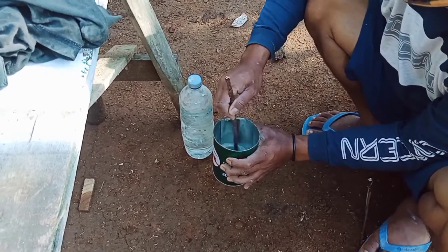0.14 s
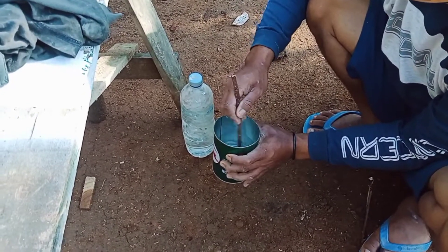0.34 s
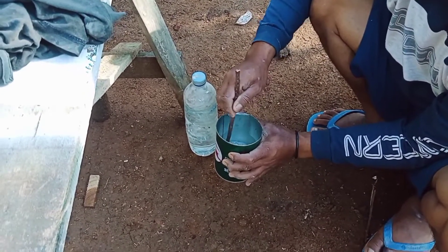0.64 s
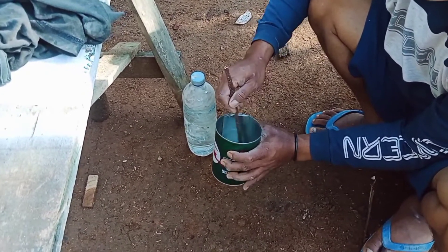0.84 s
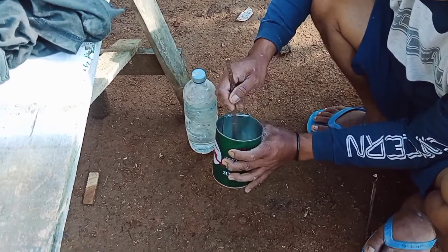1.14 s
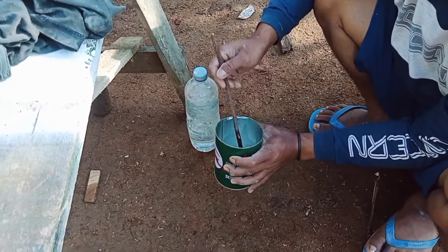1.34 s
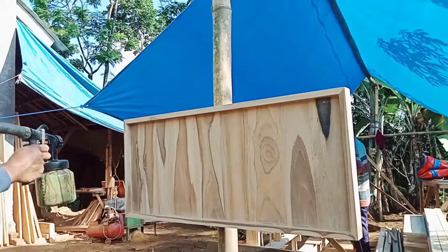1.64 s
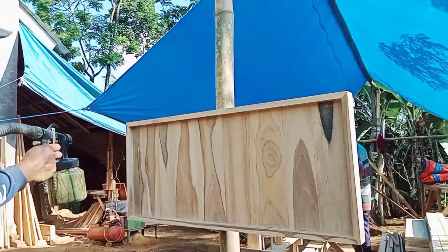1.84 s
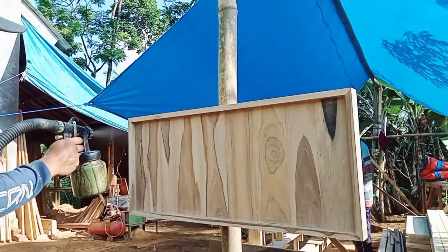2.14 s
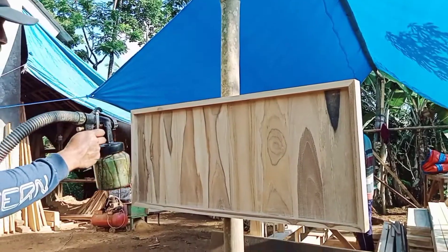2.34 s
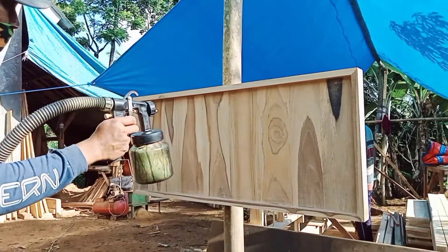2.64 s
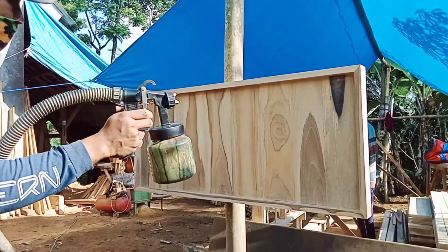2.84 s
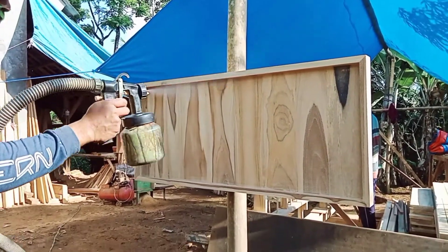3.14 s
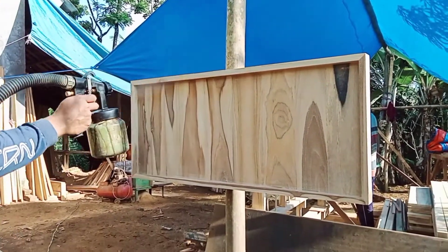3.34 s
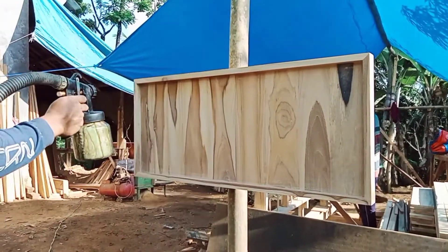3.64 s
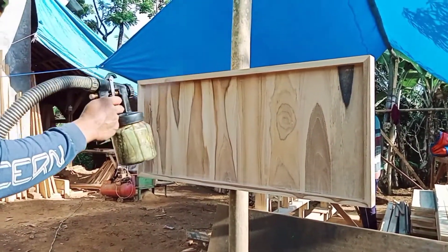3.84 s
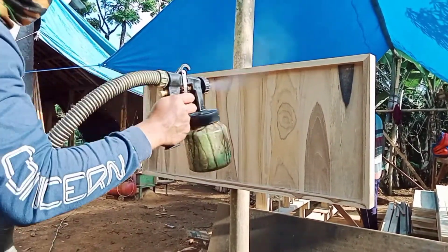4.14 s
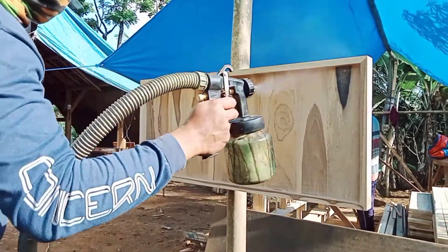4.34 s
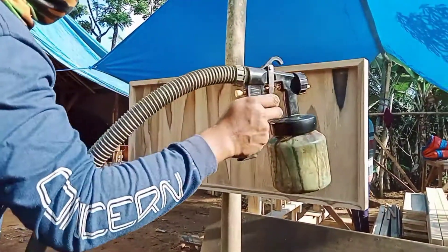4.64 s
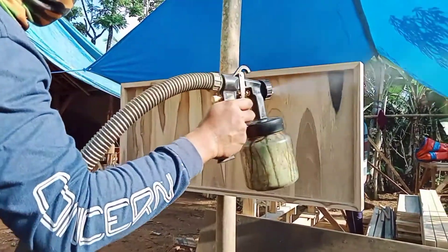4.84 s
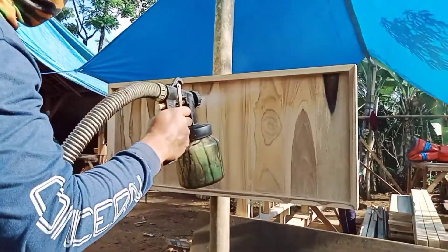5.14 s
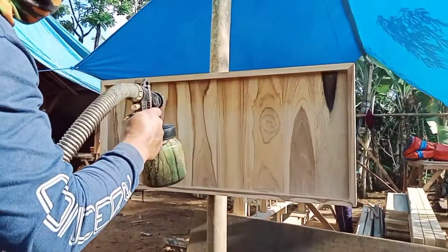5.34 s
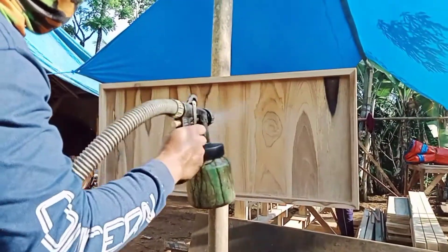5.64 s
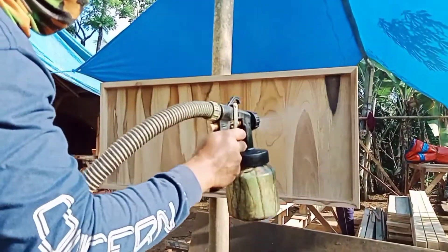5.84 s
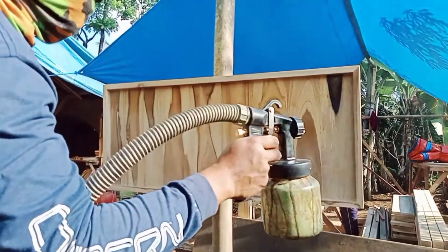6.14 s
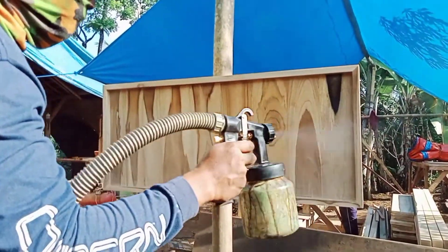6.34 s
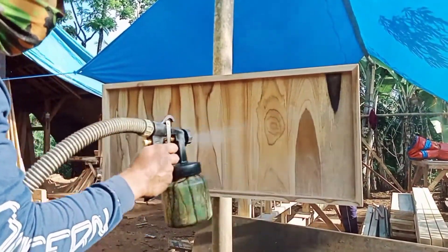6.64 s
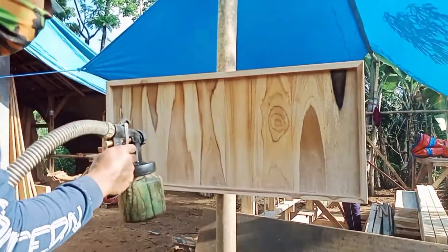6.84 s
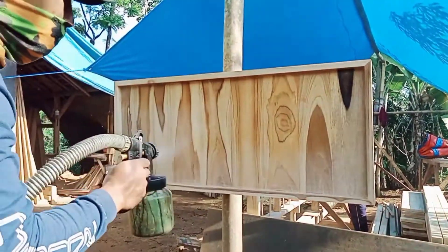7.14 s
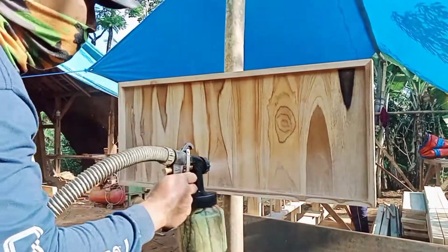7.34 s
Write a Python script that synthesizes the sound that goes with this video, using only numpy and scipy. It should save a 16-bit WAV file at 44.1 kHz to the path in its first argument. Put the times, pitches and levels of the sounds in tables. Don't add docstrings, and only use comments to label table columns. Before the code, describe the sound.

In a quiet open yard, a wooden stick stirs a hand-held paint tin, with quick damped knocks, gritty scrapes and small pings, while a bird gives a few short falling chirps. After about one and a half seconds the scene fades quickly to a turbine paint sprayer winding up to a steady mid-pitched hum, with rushing hose air and bright nozzle hiss that shifts as the gun moves. Mono phone microphone, fairly close and dry.

```python
import sys
import numpy as np
from scipy import signal
from scipy.io import wavfile
from scipy.ndimage import uniform_filter1d

SR = 44100
rng = np.random.default_rng(int(sys.argv[2]) if len(sys.argv) > 2 else 0)


def nominal_scale(level):
    x = np.asarray(level, float) / 20
    return 10 ** x


def persist_wave(psi):
    counts = np.round(np.clip(psi, -1, 1) * 32767).astype(np.int16)
    wavfile.write(sys.argv[1], SR, np.atleast_2d(counts).T)


N = 329868
TIME = np.arange(N) / SR


def evened(x):
    return x / np.sqrt(np.mean(x ** 2) + 1e-20)


def wander(x, size):
    return evened(uniform_filter1d(uniform_filter1d(x, size=size), size=size))


def read(points, hz):
    f, value = np.transpose(points)
    return np.interp(np.log(hz + 1), np.log(f + 1), value)


def shape(points, hz):
    power = nominal_scale(read(points, hz)) ** 2
    return power / power.sum()


def curves(rows, t):
    s, *columns = np.transpose(rows)
    return [np.interp(t, s, c) for c in columns]


def bell(x, centre, half_width):
    return np.exp(-((x - centre) / half_width) ** 2)


def bumps(rows, x):
    return sum(db * bell(x, centre, half) for centre, half, db in rows)


def add(mix, s, sound):
    part = mix[round(s * SR):][:len(sound)]
    part += sound[:len(part)]


def ring(x, hz, width):
    return signal.lfilter(*signal.iirpeak(hz, hz / width, SR), x)


def glide(x, hz, width):
    turn = np.exp(2j * np.pi * np.cumsum(hz) / SR)
    r = np.exp(-np.pi * width / SR)
    smooth = signal.lfilter([(1 - r) ** 2], [1, -2 * r, r ** 2], x / turn + 1e-18)
    return 2 * (turn * smooth).real


def noise(layers, patchy_db, streak_db, flicker_db):
    frames, hz = N // 256 + 5, np.fft.rfftfreq(1024, 1 / SR)[:, None]
    a, b, patches, streaks = rng.standard_normal((frames, 513, 4)).T
    patches = evened(uniform_filter1d(uniform_filter1d(patches, size=8, axis=0), size=24, axis=1))
    streaks = evened(uniform_filter1d(uniform_filter1d(streaks, size=2, axis=0), size=90, axis=1))
    gusts = evened(uniform_filter1d(rng.standard_normal(frames), size=4))
    chance_db = patchy_db * patches + streak_db * streaks / (1 + (hz / 3500) ** 2) + flicker_db * gusts
    z = (a + 1j * b) * np.sqrt(layers(np.arange(frames) * 256 / SR, hz)) * nominal_scale(chance_db)
    return signal.istft(z, nperseg=1024, noverlap=768)[1][:N] * np.sqrt(3 / 2)


# time in seconds, offset in Hz.
DRIFT_HZ = [(3.3, 0), (3.9, .9), (4.9, -.6), (5.3, -.2), (6, -1), (7.48, -1.3)]
FULL_HZ, LACK_HZ, SPIN_UP_S = 529.6, 130, 0.31


def shaft_hz(t):
    lack = LACK_HZ * np.exp(-(np.maximum(t, 1.4) - 1.6) / SPIN_UP_S)
    return FULL_HZ - lack + curves(DRIFT_HZ, t)[0]


FADE_IN_S, FADE_LENGTH_S, FADE_POWER = 1.506, 0.22, 2.73
HUM_LAW, ROAR_LAW, HISS_LAW, FIZZ_LAW = 4.2, 0.41, 0.2, 2.3
HISS_LEAD_S, HUM_LAG_S = 0.025, 0.053


def spin(t, law):
    fade = np.clip((t - FADE_IN_S) / FADE_LENGTH_S, 0, 1) ** FADE_POWER
    return fade * (shaft_hz(t) / FULL_HZ) ** law


# time in seconds, nearness in dB,
# ground-bounce notch in Hz, hose resonance in Hz, gun lowered from 0 to 1.
PAINTER = [(1.6, -3, 1620, 2105, 0), (2.35, -0.2, 1460, 2020, 0.3), (3, -2.5, 1500, 2016, 0.36),
           (3.35, -1.9, 1470, 1920, 0.4), (3.75, -1.3, 1340, 1995, 0), (4.15, 0.9, 1240, 2004, 0.1),
           (4.6, -0.5, 1190, 2055, 0.4), (5.3, -0.5, 1210, 1980, 0.76), (5.8, -0.5, 1234, 2116, 0.7),
           (6.3, -0.3, 1150, 2050, 0.6), (6.6, -1.1, 1240, 1952, 1), (7.48, -0.5, 1130, 1906, 0.96)]
# frequency in Hz, density in dB per Hz.
ROAR_SPECTRUM = [(190, -34), (255, -6.5), (450, -7.5), (680, -4), (900, -8.5), (1060, -5.5), (1700, -2),
                 (2000, -1.5), (2400, -4), (3100, -6), (4000, -13), (5000, -23.5), (6200, -30), (7600, -45)]
# time in seconds, half width in seconds, gain in dB, pitch in Hz.
CAP_RINGS = [(2.32, .1, 5, 2800), (2.85, 0.13, 4, 3000), (4.1, 0.36, 3.5, 3000), (4.6, 0.11, 1, 2200),
             (4.9, 0.17, 5.5, 3180), (5.75, 0.21, 9, 2860), (6.36, 0.11, 12, 2720), (7.3, .2, 7.5, 2660),
             (7.1, 0.25, 8, 3560), (4.5, 0.18, 5, 960), (7.36, 0.066, 8.5, 1120), (6.6, 0.2, 4.5, 1500),
             (2.76, .25, -9, 1640), (3.7, .2, -5, 1450), (4.1, 0.23, 11, 4300)]
# time in seconds, half width in seconds, gain in dB.
SURGES = [
    (2.75, 0.45, 3.5),
    (3.45, 0.12, -1.5),
    (4.75, 0.46, 2),
    (5.2, 0.12, -0.5),
    (6.3, 1, 2),
]
# frequency in Hz, half width in Hz, gain in dB.
HOSE_OVERTONES = [(839, 23, 13.5), (1370, 44, 3)]
# time in seconds, half width in seconds, gain in dB.
TURNS = [
    (2.72, 0.3, 5.5),
    (3.16, 0.026, 3),
    (4.5, 0.12, 5.5),
    (5.2, 0.23, 2),
    (6.12, 0.096, 4),
    (6.9, 0.15, 3.5),
]
ROAR_DB, TURN_ROAR = -33.5, 0.022
CAP_WIDTH_HZ = 110
OVERTONES_GONE_S, OVERTONES_FADING_S = 3.53, 0.21


def hose_power(t, hz):
    near_db, notch_hz, pipe_hz, _ = curves(PAINTER, t)
    level = nominal_scale(ROAR_DB + 0.77 * near_db + TURN_ROAR * bumps(TURNS, t)) * spin(t, ROAR_LAW)
    colour_db = 5.4 * bell(hz, pipe_hz, 55) - 7.9 * bell(hz, notch_hz, 90)
    for s, half, db, cap_hz in CAP_RINGS:
        colour_db += db * bell(t, s, half) * bell(hz, cap_hz, CAP_WIDTH_HZ)
    colour_db += bumps(SURGES, t) * np.clip(hz / 2500, 0, 1.5)
    colour_db += bumps(HOSE_OVERTONES, hz) * np.clip((OVERTONES_GONE_S - t) / OVERTONES_FADING_S, 0, 1)
    return level ** 2 * shape(ROAR_SPECTRUM, hz) * nominal_scale(colour_db) ** 2


# frequency in Hz, density in dB per Hz.
HISS_SPECTRUM = [(5500, -28), (6500, -20), (7200, -7), (7700, -8), (8300, 3), (9200, -0.5), (9800, -9.5),
                 (11000, -36)]
TOP_SPECTRUM = [(9000, -35), (9900, 6), (11300, 1), (12300, -11), (13500, -26), (14500, -22)]
FIZZ_SPECTRUM = [(11200, -16.5), (12300, -24), (13100, -8.5), (14100, -11), (15380, -3.5), (15500, -15),
                 (15640, -49), (16000, -100)]
# time in seconds, half width in seconds, gain in dB.
FANS = [
    (2.0, 0.3, 2.5),
    (2.65, 0.32, 7),
    (4.15, 0.22, 5),
    (4.5, 0.13, 7),
    (4.85, 0.077, 3),
    (6.15, 0.22, 10),
    (6.75, 0.25, -8),
]
# time in seconds, echo delay in ms.
GAP_MS = [(1.8, .832), (2.05, .724), (2.34, .726), (2.53, .815), (2.8, 1.155), (2.94, 1.092), (3.13, .936),
          (3.29, .88), (3.52, .972), (3.69, .976), (3.9, 1.056), (4.15, 1.11), (4.29, 1.196), (5.45, 1.196),
          (5.63, 1.276), (6.05, 1.665), (6.66, 1.17), (7.05, 1.08), (7.48, 1.24)]
HISS_DB, TOP_DB, FIZZ_DB = -38, -50, -47.5
LOWERED_HISS_DB, LOWERED_TOP_DB, LOWERED_FIZZ_DB = -2, -2.5, 6
WHISTLE_HZ, WHISTLE_DB, WHISTLE_GONE_S = 8200, 13, 0.14
FAN_EDGE_HZ, FAN_EDGE, FAN_FIZZ = 12100, 0.45, 0.1
SHOULDER_HZ, SHOULDER_DB = 13500, -9
ECHO_SHARE, ECHO_LOST_PER_DB, ECHO_LOST_LOWERED = 0.39, 0.008, 0.2
ECHO_LOW_HZ, ECHO_TOP_HZ = 6800, 12200


def jet_power(t, hz):
    lowered = curves(PAINTER, t)[3]
    turn_db, fan_db = bumps(TURNS, t), bumps(FANS, t)
    hiss = nominal_scale(HISS_DB + turn_db + LOWERED_HISS_DB * lowered) * spin(t + HISS_LEAD_S, HISS_LAW)
    top = nominal_scale(TOP_DB + fan_db + LOWERED_TOP_DB * lowered) * spin(t, FIZZ_LAW)
    fizz = nominal_scale(FIZZ_DB + FAN_FIZZ * fan_db + LOWERED_FIZZ_DB * lowered) * spin(t, FIZZ_LAW)

    starting = np.exp(-np.maximum(t - FADE_IN_S, 0) / WHISTLE_GONE_S)
    hiss = hiss * nominal_scale(starting * (WHISTLE_DB * bell(hz, WHISTLE_HZ, 250) - 8.3))
    top = top * nominal_scale(FAN_EDGE * fan_db * bell(hz, FAN_EDGE_HZ, 600))
    narrowing = 1.5 - 1.5 * lowered - 0.082 * fan_db
    fizz = fizz * nominal_scale(SHOULDER_DB * narrowing * bell(hz, SHOULDER_HZ, 700))

    share = np.clip(ECHO_SHARE - ECHO_LOST_PER_DB * turn_db - ECHO_LOST_LOWERED * lowered, 0, 1)
    band = 1 / (1 + (hz / ECHO_TOP_HZ) ** 6) / (1 + (ECHO_LOW_HZ / (hz + 1)) ** 8)
    echo = share * band * np.cos(2 * np.pi * hz * curves(GAP_MS, t)[0] / 1000)
    jet = hiss ** 2 * shape(HISS_SPECTRUM, hz) + top ** 2 * shape(TOP_SPECTRUM, hz)
    jet = jet + fizz ** 2 * shape(FIZZ_SPECTRUM, hz)
    return jet * nominal_scale(11 * echo) ** 2


# frequency in Hz, density in dB per Hz.
RUMBLE_SPECTRUM = [(20, -26), (40, -33), (65, -20), (110, 7), (150, 4), (190, 2.5), (215, -24),
                   (280, -19.5)]
# time in seconds, half width in seconds, gain in dB.
RUMBLE_SWELLS = [
    (1.85, 0.53, 6),
    (5, .4, 0),
    (6.25, 0.5, 5.5),
]
BLOWER_DB = -56.5


def air():
    def layers(t, hz):
        rumble = nominal_scale(BLOWER_DB + bumps(RUMBLE_SWELLS, t)) * spin(t, 0)
        return rumble ** 2 * shape(RUMBLE_SPECTRUM, hz) + hose_power(t, hz) + jet_power(t, hz)
    return noise(layers, patchy_db=1.64, streak_db=1.87, flicker_db=0.61)


# shaft order, level in dB under the hum.
OVERTONES = [(2, -25.5), (3, -27.5)]
# time in seconds, half width in seconds, gain in dB.
GLIMPSES = [(1.77, .16, 15), (2.17, .1, 14), (2.5, .12, 12), (2.78, .14, 13), (3.3, .26, 13.5),
            (3.85, .17, 8), (4.25, .22, 13), (4.75, .3, 13.5), (5.12, .1, 7), (6.45, .1, 7), (6.9, .12, 6),
            (7.38, .2, 7)]
HUM_DB, WHINE_DB, OVERTONE_WOBBLE_RAD = -27, -56.5, 0.9


def turbine():
    turn = 2 * np.pi * np.cumsum(shaft_hz(TIME)) / SR
    waver = [wander(w, 900) for w in rng.standard_normal((2, N))]
    hum = np.sin(turn)
    for k, db in OVERTONES:
        hum += nominal_scale(db - 0.5 + 5.2 * waver[1]) * np.sin(k * turn + k + OVERTONE_WOBBLE_RAD * waver[0])
    hum *= nominal_scale(HUM_DB + curves(PAINTER, TIME)[0] + 0.12 * waver[0]) * spin(TIME - HUM_LAG_S, HUM_LAW)
    whine = np.sin(7 * turn + 0.25 * waver[0])
    whine *= nominal_scale(WHINE_DB + bumps(GLIMPSES, TIME) + 2.7 * waver[1]) * spin(TIME + HISS_LEAD_S, 0)
    return np.sqrt(2) * (hum + whine)


PIPE_DB, PIPE_WIDTH_HZ, PIPE_LOWERED_DB = -50, 24, 3


def whistle():
    near_db, _, pipe_hz, lowered = curves(PAINTER, TIME)
    tone = evened(glide(rng.standard_normal(N), pipe_hz, PIPE_WIDTH_HZ))
    return nominal_scale(PIPE_DB + near_db + PIPE_LOWERED_DB * lowered) * spin(TIME - HUM_LAG_S, ROAR_LAW) * tone


def body(x, modes):
    out = 0
    for k, (hz, width, db) in enumerate(modes):
        out = out + (-1) ** k * nominal_scale(db) * ring(ring(x, hz, 2 * width), hz, width)
    return out


# frequency in Hz, width in Hz, level in dB.
TIN_MID = [(1070, 92, -5), (1360, 64, -11), (1500, 46, -3), (1800, 100, 0), (2020, 430, -5.5)]
TIN_TOP = [(2350, 84, -10), (2716, 89, -4.5), (3110, 360, -6.5), (3400, 52, -7), (3640, 300, -9)]
# time in seconds,
# peak in dB, wall pitch in Hz, clang in dB, mode under the blow in Hz.
SIDE_KNOCKS = [(0.123, -30.5, 585, -5.5, 1920), (0.174, -30.5, 595, -13, 1460), (0.228, -57, 667, 14, 1360),
               (0.307, -29, 582, -4, 1350), (0.393, -35, 670, -7, 1800), (0.426, -31, 608, -7, 2050),
               (0.493, -49, 615, 6, 1310), (0.51, -29, 626, -1.5, 1850), (0.543, -25.5, 597, -13, 2220),
               (0.553, -22.5, 552, -22, 1230), (0.589, -36.5, 664, 3.5, 1430),
               (0.649, -28.5, 598, -7, 1800), (0.658, -35, 627, 2.5, 1070), (1.104, -62, 650, 12, 1570),
               (1.131, -49, 540, 5, 2080)]
TIP_KNOCKS = [(0.042, -31.5, 574, -15, 1510), (0.054, -32.5, 610, -1.5, 1990), (0.101, -41, 605, -16, 1740),
              (0.289, -25.5, 620, -3.5, 1630), (0.608, -28.5, 593, -10, 1390), (0.718, -35, 570, -22, 1520),
              (0.73, -31.5, 604, -22, 1460), (0.778, -38, 610, -22, 1060), (0.842, -54, 620, 16, 2080),
              (0.86, -30, 588, 0, 1970), (0.883, -41, 587, -1, 1800), (0.892, -56, 603, 8, 2100),
              (0.924, -61, 522, 24.5, 2050), (1.012, -39.5, 660, -7, 2040), (1.027, -37, 588, -24, 2030),
              (1.146, -41.5, 540, -8, 1250), (1.252, -33, 640, 6, 1630), (1.282, -42, 517, -8, 1440),
              (1.297, -39, 635, -2.5, 1950), (1.312, -46, 610, -10, 2350)]
SIDE_TOP_DB, TIP_TOP_DB = -23, -0.5


def knocks():
    out, t = np.zeros(N), TIME[:4000]
    contact = (t / 0.0045 * np.exp(1 - t / 0.0058)) ** 2
    clang = (1 - np.exp(-t / 0.0014)) ** 2 * np.exp(-t / 0.007)
    blows = [(*row, SIDE_TOP_DB) for row in SIDE_KNOCKS] + [(*row, TIP_TOP_DB) for row in TIP_KNOCKS]
    rattles = rng.standard_normal((len(blows), 4000))
    for (s, db, hz, mid_db, spot_hz, top_db), rattle in zip(blows, rattles):
        wall = contact * np.sin(2 * np.pi * hz * t) + 7.3 * ring(rattle * contact, hz * 1.03, 60)
        spot = 2.5 * ring(ring(rattle * clang, spot_hz, 160), spot_hz, 90)
        middle = spot + body(rattle * clang, TIN_MID)
        upper = body(rattle * clang ** 2, TIN_TOP)
        parts = [(0, wall), (mid_db, middle), (mid_db + top_db, upper)]
        add(out, s - 0.003, sum(nominal_scale(db + level_db) * p / abs(p).max() for level_db, p in parts))
    return signal.sosfilt(signal.butter(2, 5500, fs=SR, output="sos"), out)


# start in seconds, length in seconds, pressure in dB,
# pressure change in dB, brightness in dB.
STROKES = [(0, 0.033, -50, -6, 1), (.125, 0.018, -50, -2, -6), (.165, 0.043, -44.5, 1, -18),
           (0.239, 0.09, -41.5, 4, -17.5), (0.413, 0.02, -42.5, -6, -6), (0.503, 0.063, -45, -2, -11),
           (.59, 0.026, -44.5, 0, -21), (0.645, 0.055, -46, -2, -9), (0.731, 0.022, -53.5, 0, -7),
           (0.786, 0.037, -59, -13, -1), (0.854, 0.23, -64.5, -4.5, 6), (1.122, 0.058, -54.5, 3, -4.5),
           (1.237, 0.077, -65.5, 7.5, 6), (1.333, 0.11, -71, -1, 4)]
STROKE_RISE_DB_S, STROKE_FALL_DB_S = 505, 547


def strokes(brightness):
    out = np.zeros(N)
    for s, length, db, change_db, bright_db in STROKES:
        edge_db = STROKE_RISE_DB_S * np.maximum(s - TIME, 0)
        edge_db += STROKE_FALL_DB_S * np.maximum(TIME - s - length, 0)
        held_db = db + brightness * bright_db + change_db * np.clip((TIME - s) / length, 0, 1)
        out += nominal_scale(held_db - np.minimum(edge_db, 200))
    return out


# time in seconds, low mode in Hz.
STICK_HZ = [(0, 1510), (.11, 1500), (.17, 1300), (.44, 1530), (.48, 1320), (.69, 1510), (.8, 1610),
            (1.35, 1580)]
STICK_HIGH_HZ, STICK_WANDER = 2864, 0.053
GRIT_DB, GRIT_HZ = -11.5, 8700


def scrape():
    lumps = [nominal_scale(3.3 * evened(uniform_filter1d(w, size=400))) for w in rng.standard_normal((3, N))]
    slips = (rng.random(N) < 5500 / SR) * nominal_scale(1.9 * rng.exponential(1, N))
    slips = slips * rng.choice([-1, 1], N)
    low_hz = curves(STICK_HZ, TIME)[0]
    high_hz = STICK_HIGH_HZ * (1 + STICK_WANDER * wander(rng.standard_normal(N), 2000))
    low = evened(glide(slips, low_hz, 230)) + 0.44 * evened(body(slips, TIN_MID))
    low += 0.65 * evened(ring(slips, 920, 220))
    low += 0.48 * evened(ring(ring(slips, 560, 160), 640, 80))
    high = 0.66 * evened(glide(slips, high_hz, 160)) + evened(body(slips, TIN_TOP))
    low, high = signal.sosfilt(signal.butter(2, 5000, fs=SR, output="sos"), [low, high])
    grit = slips + 3.5 * rng.standard_normal(N)
    for width_hz in (2100, 3200, 4020):
        grit = ring(grit, GRIT_HZ, width_hz)
    gains = strokes(0), strokes(0.56), nominal_scale(GRIT_DB) * strokes(0.83)
    return sum(gain * evened(x * lump) for gain, x, lump in zip(gains, (low, high, grit), lumps))


# time in seconds, peak in dB, pitch in Hz.
TICKS = [(0.0574, -44, 5330), (0.1276, -45, 8400), (0.2944, -59, 8100), (0.402, -52, 9050),
         (0.4294, -49, 8790), (0.4813, -50, 8250), (0.5237, -62.5, 8470), (0.599, -47, 8450),
         (0.6659, -46, 8700), (0.7487, -54, 8900), (0.8096, -65, 8260), (0.8594, -47, 8440),
         (0.8819, -48, 8140), (0.8939, -47, 6000), (0.9294, -43, 8000), (1.0144, -43, 8370),
         (1.1336, -46, 8460), (1.1777, -38.5, 8200), (1.254, -46, 8200), (1.286, -51, 8400),
         (1.3124, -60, 6210), (1.3239, -62, 8960)]
SNAPS = [
    (0.394, -34, 1840),
    (0.883, -37, 3140),
    (0.895, -36, 2130),
    (1.1055, -42, 1600),
    (1.2835, -50, 1600),
    (1.3112, -34, 2680),
]
# time in seconds, peak in dB.
CLICKS = [(0.0535, -37), (0.1705, -54), (0.251, -56), (0.2895, -47), (0.3945, -46), (0.5107, -48),
          (0.599, -54), (0.647, -48), (0.8046, -58), (0.8585, -46), (0.8815, -50), (0.895, -46),
          (0.921, -50), (0.929, -46), (1.011, -52), (1.2535, -37), (1.2605, -50), (1.3119, -43)]
TICK_S, SNAP_S, CLICK_S, CLICK_TOP_HZ = 0.002, 0.00106, 0.0005, 4500


def ticks():
    out, t = np.zeros(N), TIME[:900]
    rows = [(*row, TICK_S) for row in TICKS] + [(*row, SNAP_S) for row in SNAPS]
    for (s, db, hz, decay_s), snap in zip(rows, rng.standard_normal((len(rows), 900))):
        tick = snap * t * np.exp(-t / decay_s)
        for width in (0.1, 0.2, 0.25, 0.3):
            tick = ring(tick, hz, width * hz)
        add(out, s - decay_s, nominal_scale(db) * tick / abs(tick).max())
    colour = signal.butter(2, [900, CLICK_TOP_HZ], "band", fs=SR)
    for (s, db), snap in zip(CLICKS, rng.standard_normal((len(CLICKS), 900))):
        click = signal.lfilter(*colour, snap * np.exp(-t / CLICK_S))
        add(out, s, nominal_scale(db) * click / abs(click).max())
    return out


# time in seconds, peak in dB, length in seconds.
PUFFS = [(0.053, -61, .004), (0.068, -56, .007), (0.124, -59, .010), (0.1705, -62, .003),
         (0.216, -69, .004), (0.251, -66, .006), (0.33, -61, .009), (0.4015, -61, .007),
         (0.453, -68, .006), (0.516, -64, .007), (0.599, -63, .005), (0.657, -69, .005),
         (0.751, -64, .004), (0.8435, -67, .005), (0.859, -62, .006), (0.881, -57, .003),
         (0.929, -59, .005), (0.983, -72, .004), (1.011, -66, .007), (1.122, -66, .005),
         (1.151, -65, .008), (1.229, -71, .003), (1.26, -64, .012)]
# time in seconds, peak in dB, pitch in Hz.
PINGS = [(0.0538, -42, 3150), (0.0545, -30.5, 590), (0.135, -37, 590), (0.148, -45, 2700),
         (0.229, -34, 1360), (0.2922, -20.5, 1775), (0.3945, -32, 620), (0.404, -42, 3080),
         (0.4863, -39, 1320), (0.5102, -43, 2620), (0.5557, -36, 1230), (0.6053, -38, 3110),
         (0.6295, -42, 2650), (0.675, -40, 1060), (0.6983, -42, 2530), (0.8086, -44, 2830),
         (0.9258, -33.5, 2700), (0.9842, -53, 2600), (1.0874, -44, 2600), (1.1633, -49, 2680),
         (1.2201, -47, 2650), (1.237, -53, 2700), (1.2965, -47, 2650), (1.303, -42, 1100),
         (1.262, -35, 600), (1.2985, -44, 623), (0.719, -37, 597), (0.428, -38, 1720), (0.6, -34, 1080),
         (0.535, -42, 2250)]
PUFF_HZ, PING_RISE_S, PING_DECAY_S = 15200, 0.001, 0.0049


def puffs_and_pings():
    out, t = np.zeros(N), TIME[:2500]
    for (s, db, length), hiss in zip(PUFFS, rng.standard_normal((len(PUFFS), 2500))):
        puff = hiss * t * np.exp(-t / max(length, 0.001))
        puff = ring(ring(puff, PUFF_HZ, 1800), PUFF_HZ, 3000)
        add(out, s - 0.002, nominal_scale(db) * puff / abs(puff).max())
    shell = (1 - np.exp(-(t / PING_RISE_S) ** 2)) * np.exp(-t / PING_DECAY_S)
    for (s, db, hz), turn in zip(PINGS, rng.random((len(PINGS), 2))):
        pair = np.sin(2 * np.pi * (hz * t + turn[0]))
        pair += 0.36 * np.sin(2 * np.pi * (hz * 0.92 * t + turn[1]))
        add(out, s - 0.001, nominal_scale(db) * 1.4 * shell * pair)
    return out


# time in seconds, peak in dB, pitch in Hz, length in seconds.
CHIRPS = [
    (0.068, -35, 3900, 0.016),
    (0.078, -37, 3500, 0.025),
    (0.095, -38, 2980, 0.039),
    (0.728, -35, 3150, 0.02),
    (0.973, -47, 4200, 0.042),
    (0.994, -41, 3380, 0.049),
    (1.024, -37, 3000, 0.025),
]


def bird():
    out = np.zeros(N)
    for (s, db, hz, length), rasp in zip(CHIRPS, rng.standard_normal((len(CHIRPS), 4000))):
        t = TIME[:int(np.clip(length * SR, 100, 4000))]
        rasp = wander(rasp, 90)[:len(t)]
        tone = np.sin(2 * np.pi * hz * (1.03 * t - 0.04 * t ** 2 / length) + 0.9 * rasp)
        add(out, s, nominal_scale(db - 4) * np.hanning(len(t)) * (1 + 0.45 * rasp) * tone)
    return out


# frequency in Hz, density in dB per Hz.
WASH_SPECTRUM = [(45, -4), (110, -2), (170, -4), (300, -11), (460, -21), (1500, -30.5), (3300, -25),
                 (4700, -26.5), (5800, -36.5), (7300, -38), (8700, -28.5), (10500, -38), (11200, -54),
                 (15400, -47)]
# time in seconds, gain in dB.
YARD_FADE = [
    (0, 7.1),
    (1.33, 4.3),
    (1.42, 2.5),
    (1.49, 1),
    (1.54, -8),
    (1.6, -20),
    (1.71, -66),
]
WASH_DB = -59.5


def yard():
    def layers(t, hz):
        return shape(WASH_SPECTRUM, hz) * nominal_scale(WASH_DB + curves(YARD_FADE, t)[0]) ** 2
    return noise(layers, patchy_db=1.5, streak_db=3.5, flicker_db=2.4)


def scene():
    sprayer = turbine() + air() + whistle()
    tin = knocks() + scrape() + ticks() + puffs_and_pings()
    ground = np.concatenate([np.zeros(70), tin[:-70]])
    return np.tile(sprayer + tin + 0.12 * ground + bird() + yard(), (2, 1))


def low_pass(x):
    return signal.sosfilt(signal.butter(12, 15640, fs=SR, output="sos"), x)


def record(dry):
    low_cut = signal.butter(2, 75, "high", fs=SR, output="sos")
    top_cut = signal.ellip(14, 0.3, 90, 15500, fs=SR, output="sos")
    mix = signal.sosfilt(np.vstack([low_cut, top_cut]), dry)
    return low_pass(mix)


dry = scene()
out = record(dry)
persist_wave(out)
```